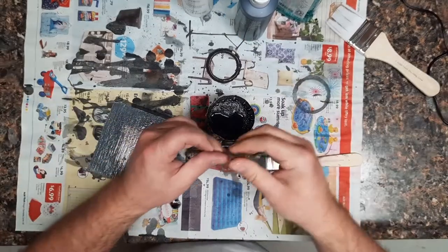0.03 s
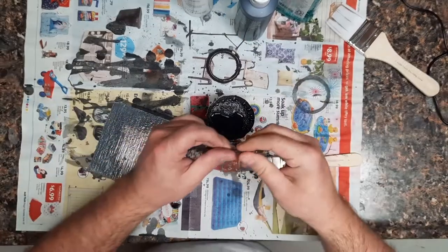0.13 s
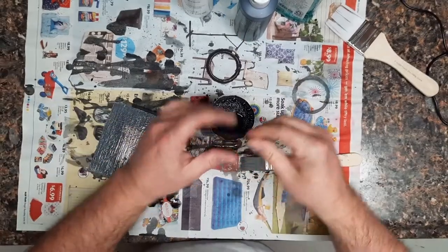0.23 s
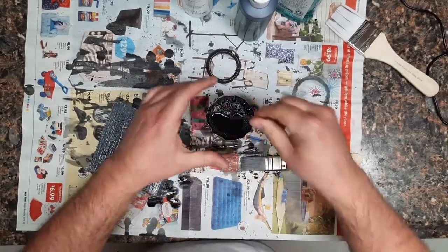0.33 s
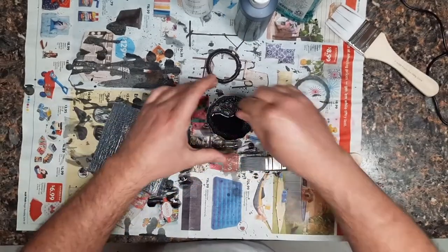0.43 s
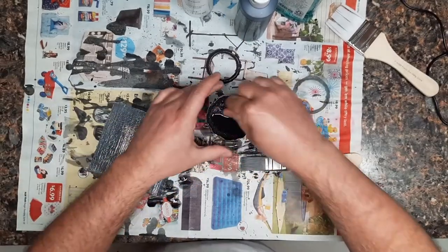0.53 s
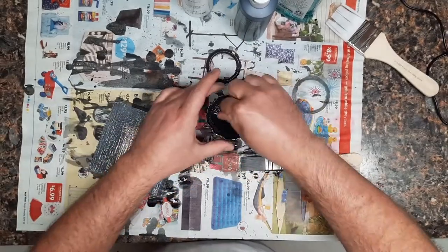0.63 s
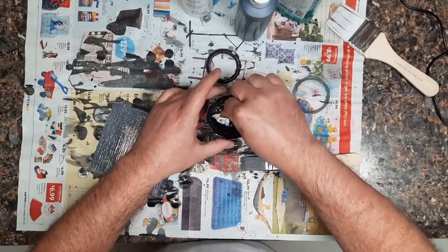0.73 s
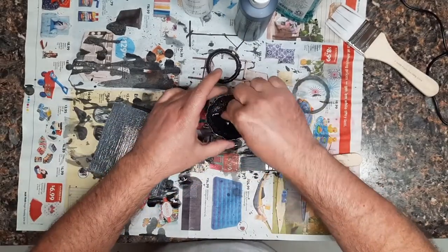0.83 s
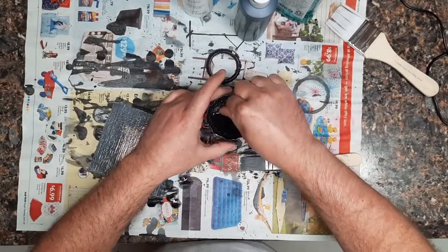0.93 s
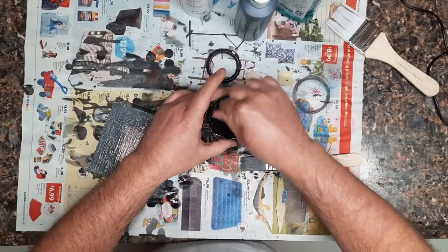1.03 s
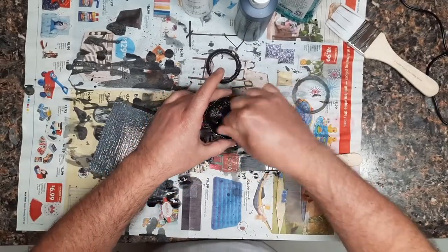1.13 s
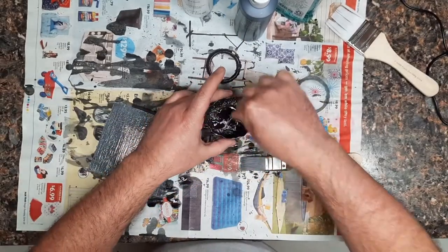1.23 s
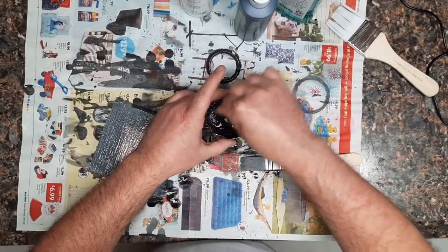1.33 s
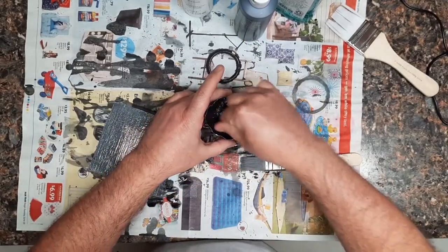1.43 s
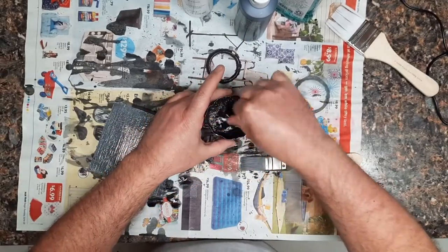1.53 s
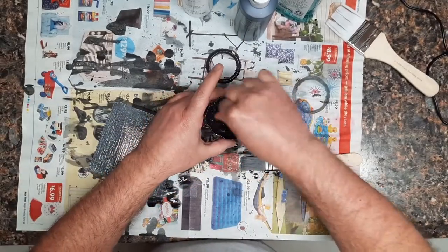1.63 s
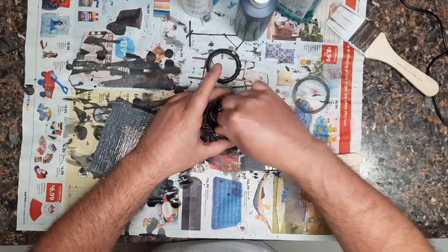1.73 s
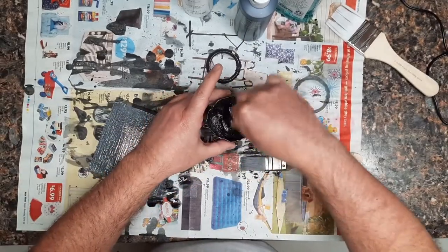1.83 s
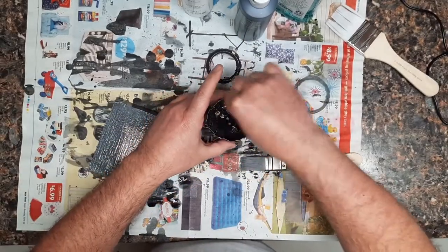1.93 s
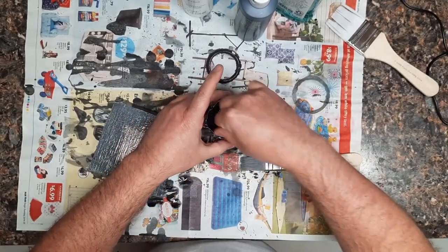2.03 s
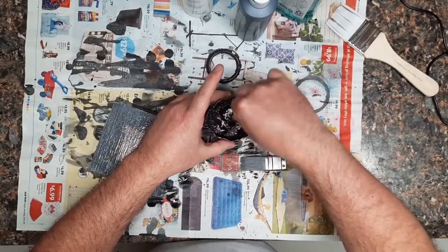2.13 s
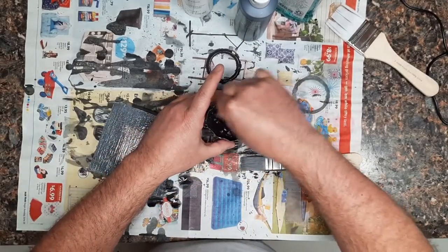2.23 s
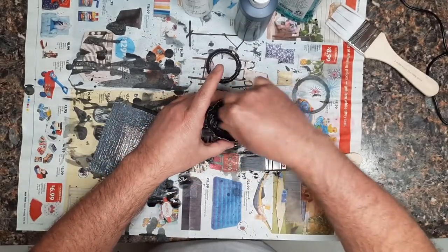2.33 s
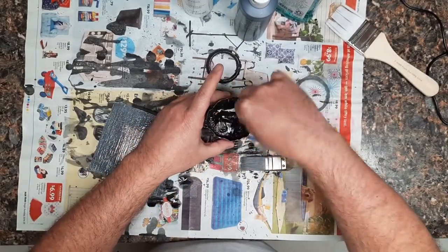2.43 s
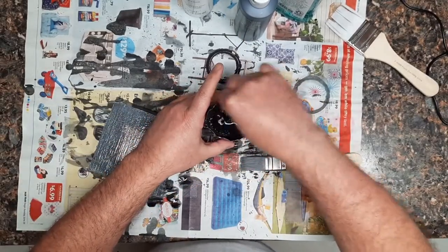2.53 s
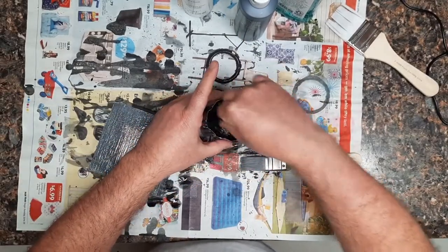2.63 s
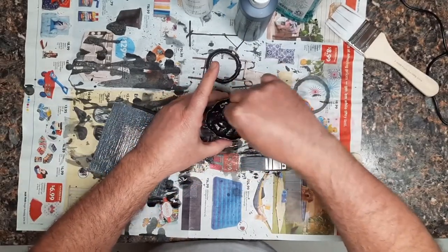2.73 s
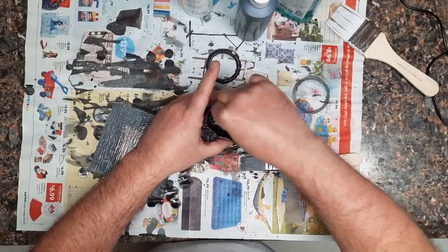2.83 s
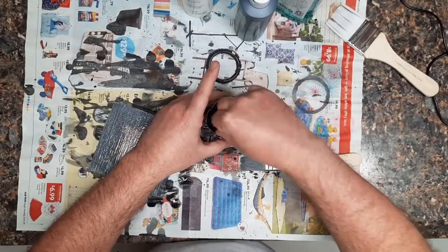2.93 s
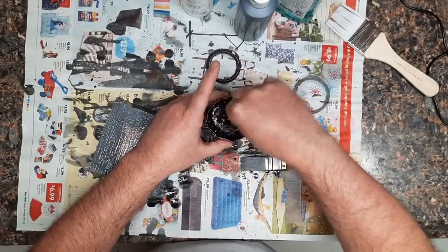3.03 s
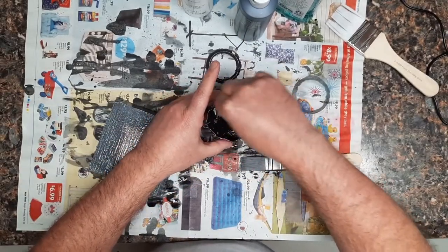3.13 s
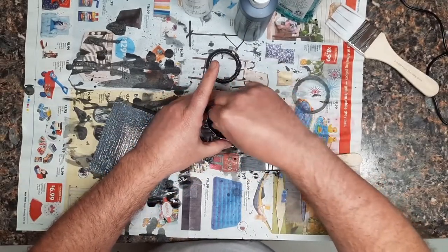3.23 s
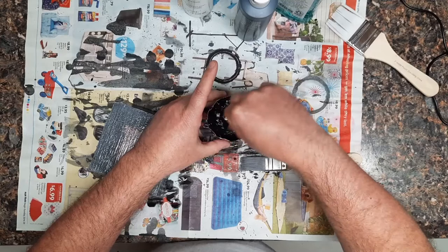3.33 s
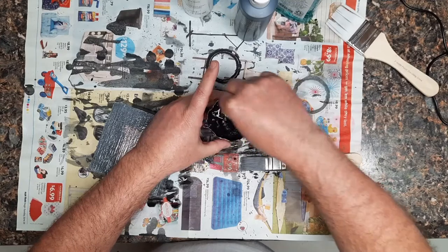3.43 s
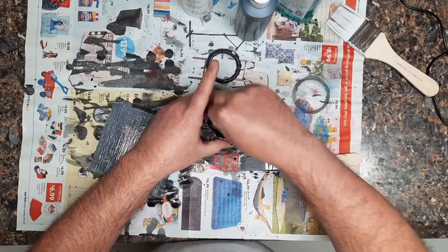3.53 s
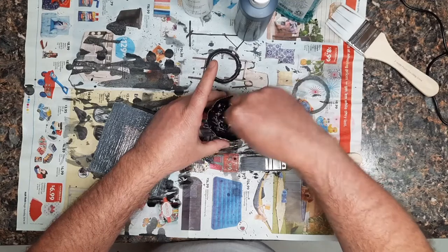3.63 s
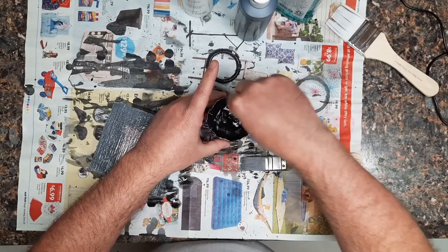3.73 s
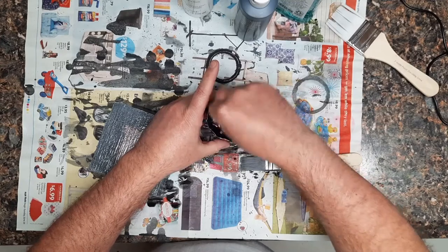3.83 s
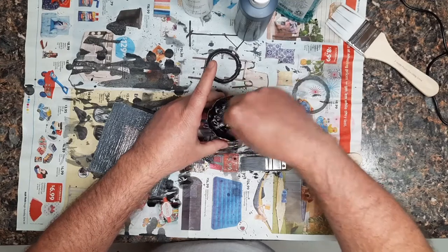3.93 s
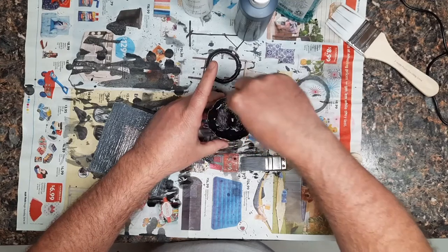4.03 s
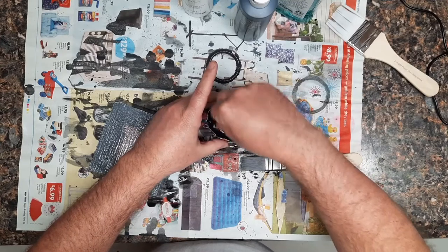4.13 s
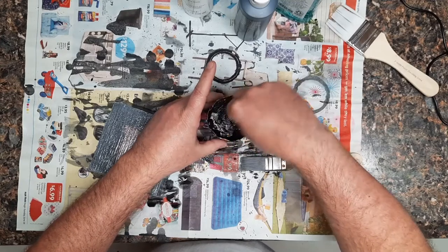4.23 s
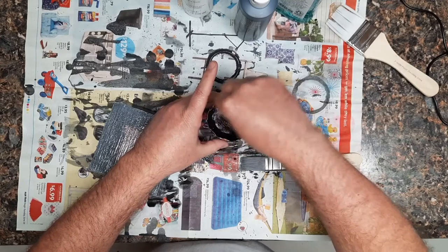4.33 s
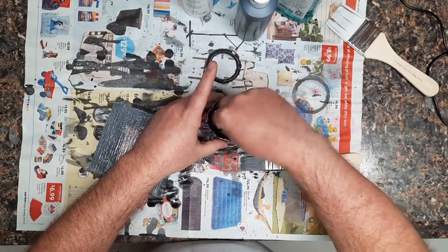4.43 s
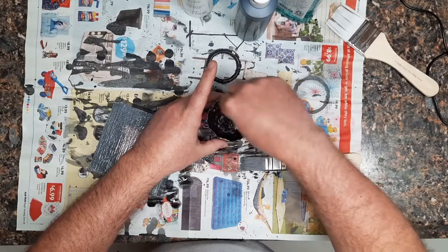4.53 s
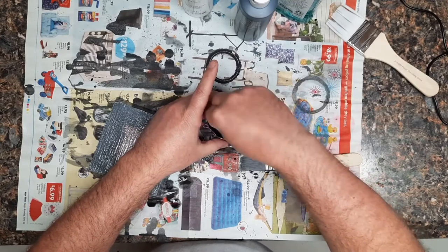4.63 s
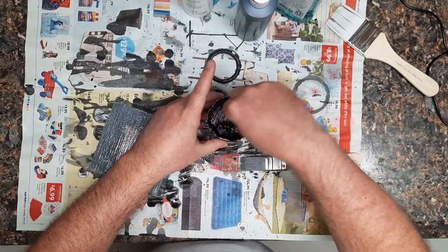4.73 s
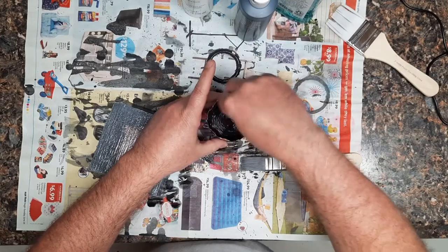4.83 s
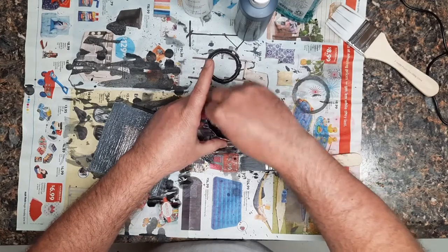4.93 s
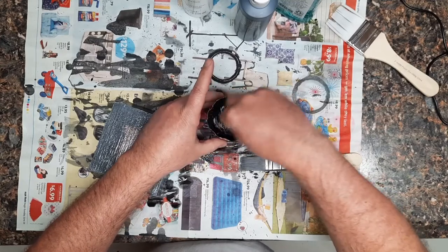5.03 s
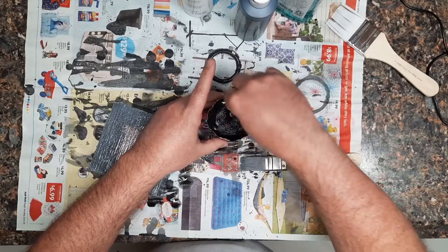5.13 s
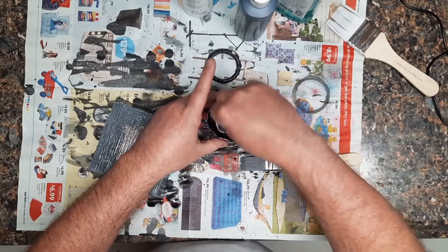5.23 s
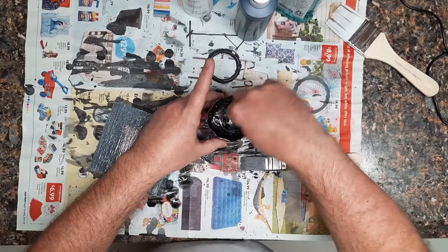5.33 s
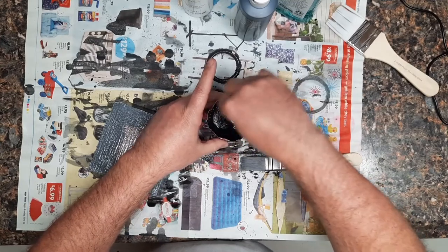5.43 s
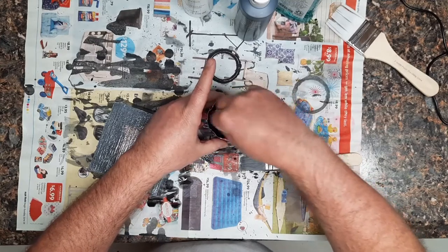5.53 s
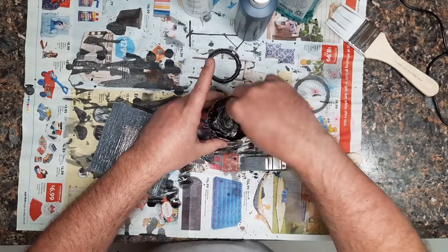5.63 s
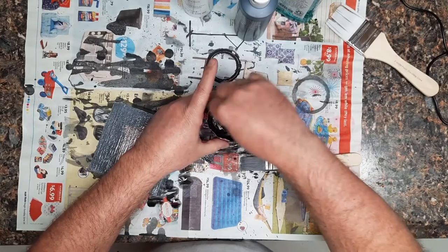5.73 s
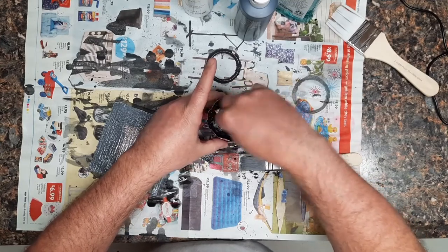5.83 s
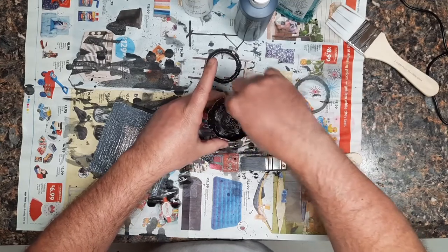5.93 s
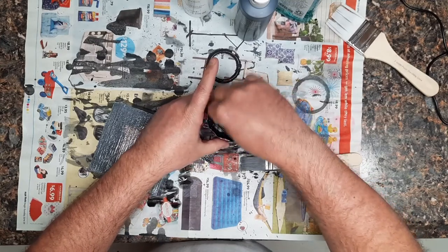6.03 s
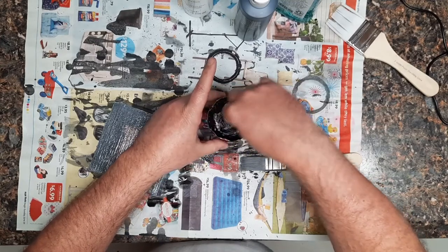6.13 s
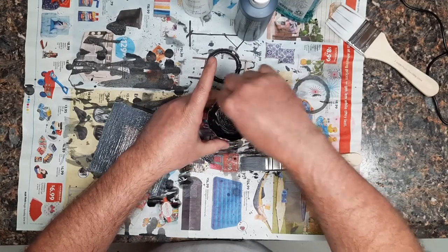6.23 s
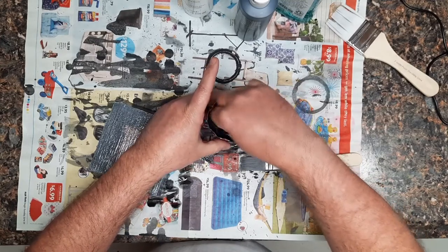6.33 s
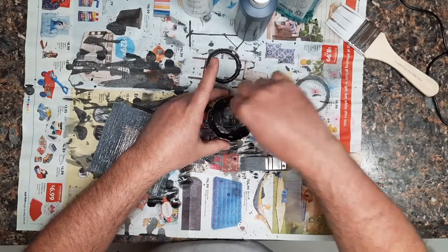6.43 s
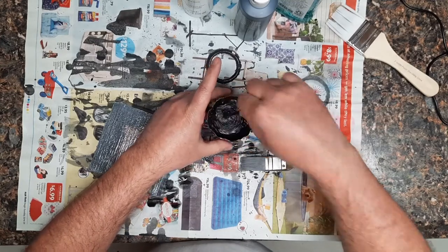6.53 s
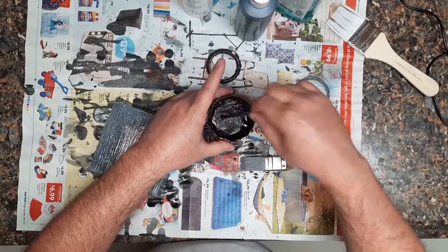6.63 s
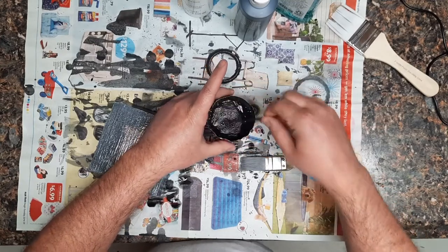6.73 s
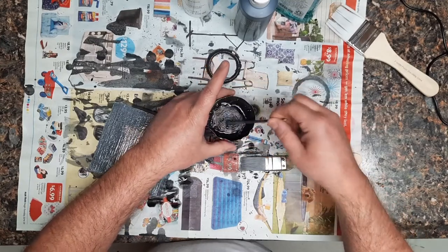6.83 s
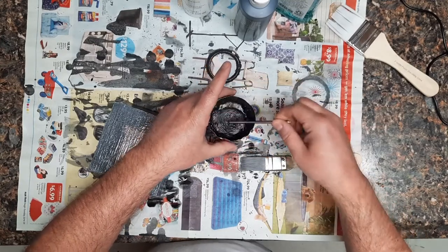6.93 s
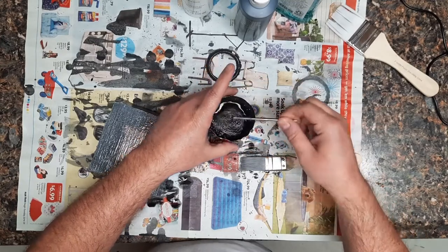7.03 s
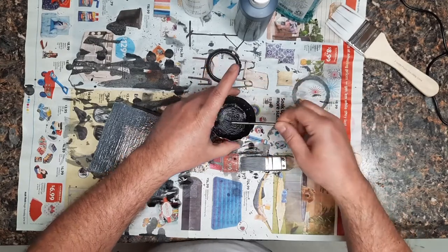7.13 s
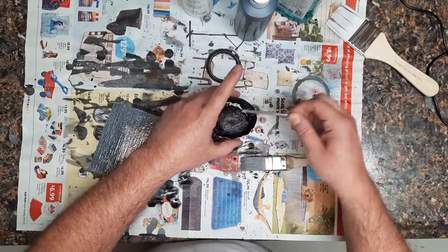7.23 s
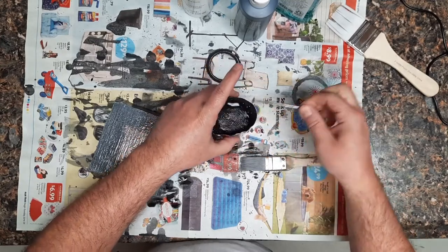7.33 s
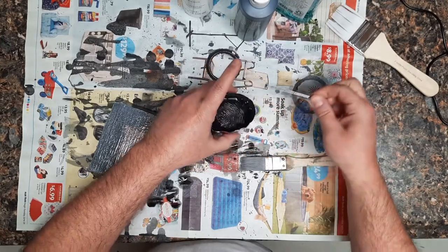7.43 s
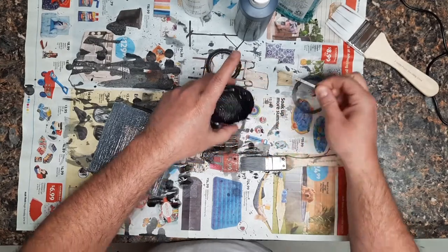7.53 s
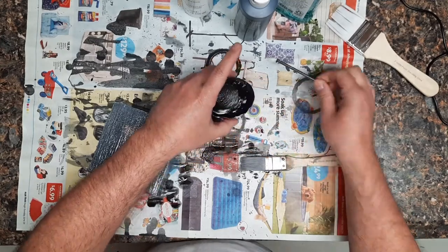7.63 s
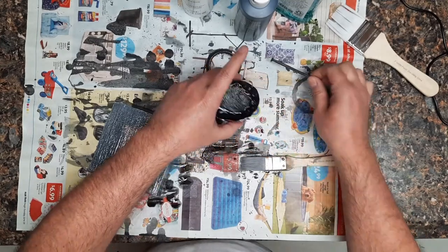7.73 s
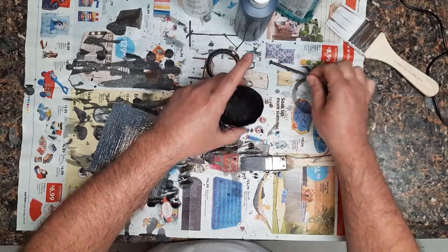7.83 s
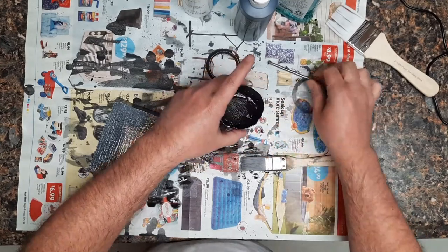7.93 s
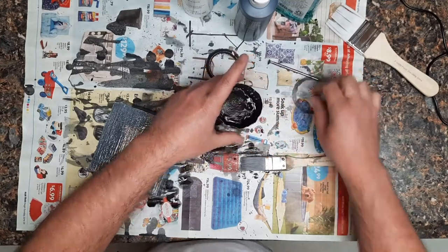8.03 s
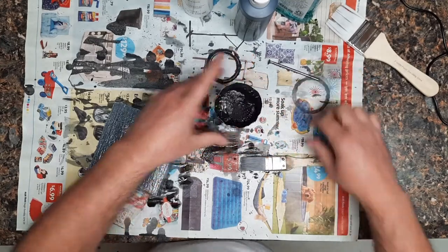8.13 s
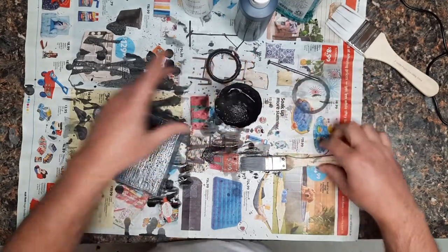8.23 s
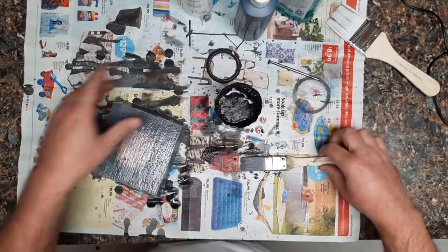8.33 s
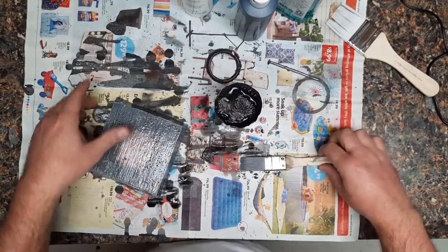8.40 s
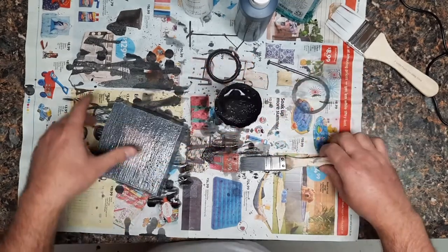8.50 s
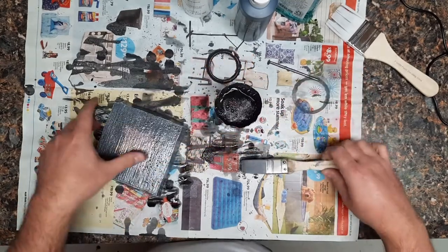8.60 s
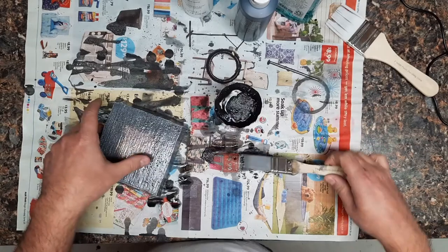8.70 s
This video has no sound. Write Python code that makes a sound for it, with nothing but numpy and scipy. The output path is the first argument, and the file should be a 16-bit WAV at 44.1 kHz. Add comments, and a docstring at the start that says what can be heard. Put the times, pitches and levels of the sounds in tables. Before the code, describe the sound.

A thin stick taps and scrapes rapidly inside a small plastic cup while stirring paint, then drops onto the counter with a light bouncing clatter.

```python
"""A thin stick stirs paint in a small plastic cup on a newspaper-covered stone counter, tapping and dragging.
Each tap is a short noise burst and a click that ring the cup, then a juddering slide and a knock below.
Drags and swipes are swelling grains of noise; squeaks are narrow rubbing tones. The dropped stick
bounces, fingers brush the paper, and soft bumps reach the slab. A small hard room answers all of this;
shaped noise and a steady sine make the faint hiss and hum beneath."""
import sys
import numpy as np
from scipy import signal
from scipy.fft import rfft, irfft
from scipy.io import wavfile
from scipy.ndimage import uniform_filter1d

SR = 44100
rng = np.random.default_rng(int(sys.argv[2]) if len(sys.argv) > 2 else 0)


def master(y):
    """Save y as 16-bit WAV."""
    cut = np.clip(np.atleast_2d(y).T, -1, 1)
    pcm = np.round(cut * 32767)  # scale
    wavfile.write(sys.argv[1], SR, pcm.astype(np.int16))


N = 386536   # length in samples


def from_db(db):
    """Turn decibels into a gain."""
    return 10 ** (np.asarray(db) / 20)


def rms_one(x):
    """Scale to unit rms."""
    return x / np.sqrt(np.mean(x ** 2) + 1e-20)


def at_hz(points, hz):
    """Read a curve between its points, on a logarithmic frequency axis."""
    point_hz, values = np.array(points).T
    return np.interp(np.log(hz), np.log(point_hz), values)


def coloured(x, spectrum):
    """Filter with unit energy and minimum phase, so that nothing sounds before the contact."""
    hz = np.maximum(np.fft.rfftfreq(4096, 1 / SR), 1)
    cepstrum = irfft(np.log(from_db(at_hz(spectrum, hz))))
    cepstrum[1:2048] *= 2   # folding the second half onto the first gives minimum phase
    cepstrum[2049:] = 0
    response = irfft(np.exp(rfft(cepstrum)))
    return signal.oaconvolve(x, response / np.linalg.norm(response))[:len(x)]


def body(drive_of, modes):
    """Side-by-side resonances of alternating sign, mode k driven by drive_of(k); unit power for unit white noise."""
    out, power = 0, 0
    for k, (hz, width, level_db) in enumerate(modes):
        radius = np.exp(-np.pi * width / SR)
        gain = (1 - radius ** 2) / 2
        b = gain * np.array([1, 0, -1]) * from_db(level_db) * (-1) ** k
        a = [1, -2 * radius * np.cos(2 * np.pi * hz / SR), radius ** 2]
        out = out + signal.lfilter(b, a, drive_of(k) + 1e-18)
        power += from_db(2 * level_db) * gain
    return out / np.sqrt(power)


def bursts(s, level_db, ms, power=1):
    """Noise that rises in a millisecond or two and fades over ms (0.5 to 120); a higher power holds, then stops."""
    envelope, t = np.zeros(N + 6000), np.arange(6000) / SR
    starts = (s * SR).astype(int)
    fades = np.clip(ms, .5, 120) / 1000
    for at, gain, fade in np.broadcast(starts, from_db(level_db), fades):
        envelope[at:at + len(t)] += gain * (1 - np.exp(-t / 0.00057)) * np.exp(-(t / fade) ** power)
    return envelope[:N] * rng.standard_normal(N)


def grains(per_s, spread_db):
    """Random slips of uneven size and either sign; rms 1."""
    sizes = from_db(spread_db * np.minimum(rng.exponential(1, N), 4)) * rng.choice([-1, 1], N)
    return rms_one(sizes * (rng.random(N) < per_s / SR))


def strokes(s, level_db, ms):
    """Bell-shaped swells of pressure, one per stroke."""
    t = np.arange(N) / SR
    return sum(from_db(db) * np.exp(-((t - at) * 1000 / half) ** 2)
               for at, db, half in np.broadcast(s, level_db, ms))


# How alike left and right are: (frequency [Hz], likeness [1 = the same, 0 = unrelated])
LIKENESS = [(50, .7), (300, .55), (700, .35), (1300, .5), (3000, .1), (12000, 0)]
# How the two sides differ: (frequency [Hz], left minus right [dB])
BALANCE = [(60, -1.5), (150, -1.5), (600, 1.5), (1500, 4.5), (3500, -1), (8000, 0.5), (14000, 1.5)]


def band_pairs(length, shape):
    """Half-octave bands of stereo noise, each with its likeness and balance, shaped by shape(Hz)."""
    out, edges = 0, 25 * 2 ** np.arange(0, 9.6, .5)
    white = rng.standard_normal((2, 2, length))   # neighbouring bands use different noise
    for k, (low, high) in enumerate(zip(edges, edges[1:])):
        band = signal.butter(2, [low, high], "band", fs=SR, output="sos")
        mid, side = signal.sosfilt(band, white[k % 2])
        hz = np.sqrt(low * high)
        alike = np.clip(at_hz(LIKENESS, hz), -1, 1)
        pair = np.sqrt(1 + alike) * mid + np.sqrt(1 - alike) * side * [[1], [-1]]
        balance = from_db(at_hz(BALANCE, hz) / 2 * np.array([[1], [-1]]))
        out = out + shape(hz) * pair * balance
    return out


# Tone of the background air: (frequency [Hz], relative level [dB per Hz])
AIR = [(15, -60), (25, -33), (43, -17.5), (90, -11), (121, -10.5), (163, -19), (220, -15.5), (280, -31.5),
       (313, -13.5), (389, -30.5), (1360, -38), (14800, -41), (16500, -61.5)]


def air():
    """Steady stereo noise shaped like the faint hiss and rumble of the place."""
    return from_db(-71) * rms_one(band_pairs(N, lambda hz: from_db(at_hz(AIR, hz))))


def hum():
    """Mains hum: one steady sine at 120 Hz, with an rms level of -75.5 dB."""
    return from_db(-75.5) * np.sqrt(2) * np.sin(2 * np.pi * 120 * np.arange(N) / SR)


# Deepest counter resonances: (frequency [Hz], width [Hz], level [dB])
SLAB = [(45, 6.7, -6), (66.5, 6, 2.5), (117, 70, -5.5)]
# Hand or cup bumping the counter: (time [s], level [dB])
THUMPS = [(0.635, -41.5), (1.271, -50.5), (1.82, -41.5), (2.64, -39.5), (3.311, -60), (4.998, -65),
          (5.223, -50), (5.596, -51.5), (6.171, -60), (6.937, -43), (7.128, -43.5), (7.959, -42.5),
          (8.086, -48)]


def thumps():
    """Soft bumps, fading over 36 ms, reach only the deepest modes."""
    push = bursts(*np.transpose(THUMPS), 36)
    return body(lambda k: push, SLAB)


# Main resonances of the cup: (frequency [Hz], width [Hz], level [dB])
CUP = [(1185, 30, 4), (1378.4, 230, -0.5), (1393.4, 165, 9), (1481, 137, 7), (1679, 47, 6), (2000, 65, 5),
       (1540, 2000, -11.5)]


def ring_cup(drive_of):
    """The cup wall rings at its main pitches."""
    return body(drive_of, CUP)


# Higher resonances of the cup: (frequency [Hz], width [Hz], level [dB])
CUP_UPPER = [(2494, 120, -9.5), (3050, 70, 3), (3190, 330, -2.5), (3406, 100, 2), (3610, 130, -4.5),
             (4360, 220, -5.5)]


def ring_upper_cup(drive_of):
    """The cup wall rings at its higher pitches."""
    return body(drive_of, CUP_UPPER)


# Resonances of the counter: (frequency [Hz], width [Hz], level [dB])
COUNTER = [(174, 29, -10), (325, 43, -1), (466, 61, -0.5), (555.7, 150, -5), (814, 280, -6.5)]


def ring_counter(drive):
    """The stone counter answers a knock or a rumble."""
    return body(lambda k: drive, COUNTER)


# The dry snap of a contact: (frequency [Hz], relative level [dB per Hz])
CRACK = [(500, -29.5), (1000, -16.5), (2200, -8.5), (4500, -6), (7800, -5.5), (13000, -11.5), (16500, -14)]


def snap(x):
    """Give a drive the bright, dry colour of hard things touching."""
    return coloured(x, CRACK)


# Rustle of paper: (frequency [Hz], relative level [dB per Hz])
PAPER = [(1500, -18), (3500, -16), (5500, -2.5), (8000, 2), (13000, -1), (16500, -9.5)]
# Fingers brushing: (time of the peak [s], level on paper [dB], half-length [ms])
BRUSH = [(7.744, -66.5, 73), (7.864, -67, 27), (8.06, -63, 31), (8.324, -54, 43), (8.44, -68, 60),
         (8.55, -70, 42), (8.68, -70, 43)]


def brush():
    """Skin rustles on paper in fine grains and faintly rubs the cup."""
    rub = grains(9500.0, 5.9) * strokes(*np.transpose(BRUSH))
    return coloured(rub, PAPER) + from_db(-23) * ring_cup(lambda k: rub)


# Resonances of the free stick: (frequency [Hz], width [Hz], level [dB])
STICK = [(4124, 120, -16), (6600, 28, 2), (12690, 24, 1)]
# The stick lands and bounces: (time [s], blow level before an 8 dB cut [dB],
# counter knock relative to the uncut blow [dB])
DROP = [(7.9427, -16.5, -19), (7.955, -24, -37), (7.968, -29, -22), (7.9844, -22, -18), (7.994, -39, -17),
        (8.076, -41, -16)]


def drop():
    """The free stick rings thinly as it bounces, with the cup and counter answering."""
    s, blow_db, knock_db = np.transpose(DROP)
    hit = bursts(s, blow_db - 8, 8.6)
    thud = bursts(s, blow_db + knock_db, 12.0)
    stick = from_db(-1.0) * body(lambda k: hit, STICK)
    cup = from_db(-4) * body(lambda k: hit, CUP + CUP_UPPER)
    return snap(hit) + stick + cup + ring_counter(thud)


# Faint rubbing tones: (time [s], pitch [Hz], level [dB], length [ms], held to at most 120)
SQUEAKS = [(.8, 1110, -66.5, 150), (7.681, 2114, -79.5, 97), (1.719, 560, -45, 32), (6.779, 2476, -62, 34),
           (6.97, 1656, -52, 25), (8.072, 1260, -55.5, 44), (8.17, 1200, -79, 110), (8.29, 1307, -79, 66)]


def squeaks():
    """Rubbing noise in one narrow resonance, 65 Hz wide."""
    out = 0
    for s, hz, level_db, ms in SQUEAKS:
        rub = bursts(np.array([s]), level_db, ms, power=1.6)
        out = out + body(lambda k: rub, [(hz, 65, 0)])
    return out


# Quick wet swipes along the wall: (time of the peak [s], level [dB], half-length [ms])
SWIPES = [(1.366, -48.5, 17), (1.587, -49, 13), (2.189, -38.5, 8.3), (2.455, -46, 17), (3.118, -46, 21.6),
          (3.426, -47, 24), (3.691, -47, 9.6), (4.266, -42, 15), (4.553, -41.5, 12), (4.841, -47.5, 16),
          (5.681, -40, 10.7), (5.917, -45.5, 11.6), (6.212, -40, 18), (6.427, -44, 16)]


def swipes():
    """Bright grainy hiss swells and fades under a bell-shaped stroke."""
    return snap(grains(5300.0, 1.0) * strokes(*np.transpose(SWIPES)))


# The stick drags round the wall: (time of the peak [s], level [dB], half-length [ms],
# counter rumble relative to the drag [dB])
DRAG = [(0.7, -63.5, 38, -14), (1.2, -91, 270, 10), (1.57, -55.5, 46, -18), (1.74, -46.5, 76, -6.5),
        (2.65, -86, 360, -9), (3.06, -54.5, 46, -6.5), (3.42, -55.5, 46, -9), (3.601, -51.5, 90, -4),
        (4.0, -61, 39, 0), (4.27, -60, 81, -18), (4.6, -67, 300, -24), (4.83, -60, 41, -6),
        (5.268, -45.5, 41, -5), (5.63, -43.5, 38, -10), (6.28, -46.5, 36, -1), (6.36, -64, 60, 2),
        (7.01, -69, 56, -25)]


def drag():
    """Dense uneven slips ring the cup, and sparser jolts ring the counter."""
    s, drag_db, ms, rumble_db = np.transpose(DRAG)
    press = strokes(s, drag_db, ms)
    slips = grains(1500., 5.5) * press
    jolts = grains(310.0, 7.6) * strokes(s, drag_db + rumble_db, ms)
    cup = ring_cup(lambda k: slips) + from_db(-7) * ring_upper_cup(lambda k: slips)
    treble = snap(grains(5000., 3.0) * press * from_db(-3))
    return cup + treble + ring_counter(jolts)


BLOW_MS, THUD_MS = 4.62, 16.3   # fade times of the blow and of the knock
LEAD_DB = -27.5   # faint bright noise before each blow, relative to the blow
SLIDE_DB, SLIDE_FOLLOWS = -40.5, 0.61   # slide after a -30 dB blow; share of the blow's swing it follows
SPOT_DB_PER_OCT, SLIDE_FAVOUR = -30.5, 0.88   # modes fade away from the spot's pitch; less so in a slide
UPPER_DB = -7.5   # higher modes relative to the blow
DAMPED_HZ, DAMPED_DB, DAMPED_OCT = 1584, -13.5, 0.11   # spots near this pitch sound them more weakly
WANDER_DB, WANDER_S = 4.5, .02   # size of the random level wander, and seconds between its new values
CLICK_DB, CLICK_CUT_HZ = 15, 2500   # click relative to the blow; soft plastic dulls it above the cut
CLICK_DIRECT_DB = -5.5   # click heard straight from the wall, relative to the click driving the modes

# Stick on cup: (time [s], blow level [dB], pitch favoured by the spot struck [Hz], snap relative to blow [dB],
# counter knock relative to blow [dB], slide length [ms])
TAPS = [(0.53, -43.5, 1640, -12, -17, 58), (0.6267, -21.5, 1500, -9.5, -23, 5.8),
        (0.635, -15.5, 1340, -17, -18.5, 42), (0.7711, -28, 2000, -5.5, -33, 32.5),
        (0.9674, -44, 2030, -5.5, -35, 29.7), (1.097, -48, 1400, -7, -37, 24),
        (1.2089, -35.5, 1560, -41, -51, 20), (1.2678, -25, 1450, -10.5, -33, 11.3),
        (1.277, -41.5, 1730, -4, -12, 77), (1.444, -46, 1340, -18, -16, 14),
        (1.455, -35, 1410, -28, -15, 27), (1.6051, -23, 1870, -2.5, -48, 2.8),
        (1.654, -33.5, 1440, -7, -31, 39), (1.726, -37.5, 1370, -0.5, -24, 21),
        (1.8021, -24.5, 1410, -13, -33, 7.1), (1.8552, -24.5, 1380, -8.5, -32, 37),
        (1.8982, -39, 1350, 0, -29, 4.2), (1.929, -26, 1320, -2.5, -27.5, 17),
        (2.0309, -25, 1390, -4, -38, 32), (2.0876, -25, 1280, -15, -39, 27),
        (2.152, -41, 1510, -14, -40, 35), (2.2063, -39, 1190, -12, -24, 35),
        (2.2305, -28.5, 1680, -2, -18, 52), (2.2583, -34.5, 1220, -21, -17, 7.7),
        (2.41, -25, 1740, -19.5, -16.5, 19.4), (2.509, -49, 2000, 5, -30.5, 8),
        (2.5565, -42.5, 1640, 2.5, -17, 21.4), (2.6305, -10, 1560, -0.5, -21, 50),
        (2.6823, -32.5, 1450, -1.5, -13, 64), (2.754, -23, 1730, -27, -36, 21),
        (2.9494, -29.5, 1680, -7, -27.5, 32), (3.0115, -25.5, 1440, -17, -17.5, 3.1),
        (3.14, -59, 1800, -14, -6.5, 6.8), (3.205, -61.5, 1360, -13, -30, 5.3),
        (3.273, -35, 1540, -32, -31, 24.5), (3.308, -31.5, 1480, -31, -6.5, 6),
        (3.321, -28, 1415, -27, -18, 14.4), (3.4414, -30.5, 1610, -30, -26, 6),
        (3.4714, -30, 1410, -1.5, -21, 9.2), (3.524, -41, 1500, -11, -40, 32),
        (3.5694, -27.5, 1340, -13, -12.5, 22), (3.618, -38, 1320, -10, -17, 13),
        (3.736, -51, 1580, -23, -29, 7.6), (3.886, -27.5, 1500, -12, -15.5, 17),
        (3.9, -26.5, 1292, -17, -16.5, 85), (3.9667, -43, 1260, -1.5, -2.5, 54),
        (4.0203, -26.5, 1400, 0, -25.5, 26), (4.169, -26.5, 1680, -9, -22, 51),
        (4.2049, -28.5, 1400, -25, -9, 120), (4.277, -36.5, 1360, -3, -3, 29),
        (4.4164, -20.5, 1640, -11, -21, 48), (4.4497, -20, 1320, -12.5, -12.5, 27),
        (4.507, -35.5, 1680, -12, -25, 32), (4.5897, -19, 1520, -5.5, -30.5, 44),
        (4.625, -20.5, 1560, -13, -40, 36), (4.7076, -20, 1450, -17.5, -18, 10),
        (4.91, -57, 1890, 8.5, -6, 15.7), (4.9902, -23, 1360, -10.5, -15.5, 37),
        (5.0236, -30.5, 1380, -19, -19, 36), (5.0627, -40, 1410, 0.5, -15, 34),
        (5.1124, -42, 1600, -21, -42, 41), (5.131, -30, 1660, -10, -45, 33),
        (5.2284, -25, 1580, -6, -11, 16), (5.296, -21, 1630, -4.5, -16, 41),
        (5.3245, -22, 1310, -13.5, -11, 50), (5.364, -30.5, 1640, -1.5, -10.5, 33),
        (5.487, -53, 1430, -9, -20, 4.6), (5.525, -24.5, 1340, -6, -33, 35),
        (5.569, -15, 1380, -8, -22, 15), (5.701, -39, 1600, -21, -38, 9.5),
        (5.8332, -35.5, 1380, -7, -11.5, 41), (5.8797, -37.5, 1400, -6, -9.5, 30),
        (6.097, -37, 1580, -5, -10, 53), (6.1167, -18.5, 1400, -10, -20.5, 9.8),
        (6.162, -36.5, 1400, -6.5, -21, 37), (6.2519, -15.5, 1550, -6, -30, 24.5),
        (6.3787, -19.5, 1490, -21.5, -17.5, 21), (6.7795, -46, 1640, -7.5, -15, 27.4),
        (6.9316, -25.5, 1620, -9.5, -4, 53), (6.982, -34, 1610, -22, -36, 28.6),
        (7.1166, -11, 1486, -2, -11, 62.5)]


def taps():
    """Every tap favours the cup modes near one pitch, snaps, slides on, and knocks the counter."""
    s, blow_db, spot_hz, snap_db, knock_db, ms = np.transpose(TAPS)
    slide_db = SLIDE_DB + SLIDE_FOLLOWS * (blow_db + 30)
    damping = np.exp(-(np.log2(spot_hz / DAMPED_HZ) / DAMPED_OCT) ** 2)
    upper_db = UPPER_DB + DAMPED_DB * damping
    # the tip sticks and slips as it slides
    judder = rms_one(uniform_filter1d(np.abs(grains(500., 2.0)), size=150))

    def blow(db):
        return bursts(s, blow_db + db, BLOW_MS)

    def slide(db):
        return judder * bursts(s, db + slide_db, ms, power=7.2)

    # faint bright noise that starts 5 ms before each blow
    lead_in = snap(bursts(s - .005, blow_db + LEAD_DB, 12.0))
    clicks = np.zeros(N)
    clicks[((s + .001) * SR).astype(int)] = from_db(blow_db + CLICK_DB)
    clicks = signal.lfilter(*signal.butter(2, CLICK_CUT_HZ, fs=SR), clicks)

    # each moment uses the spot of the latest tap
    latest = np.maximum(np.searchsorted(s * SR, np.arange(N)) - 1, 0)
    share_db = SPOT_DB_PER_OCT * np.abs(np.log2(spot_hz[:, None] / np.array(CUP)[:, 0]))
    chance = rng.standard_normal((len(CUP) + len(CUP_UPPER), 1000))

    def wander(k):
        """The level of each mode wanders as the tip moves."""
        steps = np.arange(N) / SR / WANDER_S
        return from_db(WANDER_DB * np.interp(steps, np.arange(chance.shape[1]), chance[k]))

    hit, rub = blow(0) + clicks, slide(0)
    high_hit, high_rub = blow(upper_db), slide(upper_db)

    def cup_drive(k):
        struck = hit * from_db(share_db[:, k])[latest]
        rubbed = rub * wander(k) * from_db(SLIDE_FAVOUR * share_db[:, k])[latest]
        return struck + rubbed

    cup = ring_cup(cup_drive) + ring_upper_cup(lambda k: high_hit + high_rub * wander(-k - 1))
    snaps = snap(blow(snap_db) + slide(snap_db))
    # the heavy slab answers late
    thud = bursts(s + 0.0038, blow_db + knock_db, THUD_MS)
    return cup + lead_in + from_db(CLICK_DIRECT_DB) * clicks + snaps + ring_counter(thud)


ROOM_DB = 5   # level of the reflections, before the shared scaling at the end of room()
FILL_CYCLES, PATTERNS = 0.86, 12   # cycles for the reflections to fill up; number of patterns in turn
# How long the room rings: (frequency [Hz], time to fall by 60 dB [s])
ROOM_T60 = [(100, 0.28), (300, 0.27), (800, 0.18), (2000, 0.21), (5000, 0.24), (13000, 0.17)]
# Counter and hands echo the direct sound: (delay to left [ms], delay to right [ms], level re direct [dB])
NEAR_ECHOES = [(.35, .6, -15), (1.3, .9, -15), (2.2, 2.9, -15.5), (4.1, 3.5, -5.5)]


def room(x):
    """Direct sound, then reflections that fill up slower in the bass, die band by band
    and change to a new random pattern at twelve equal steps."""
    length, step = SR // 4, N // PATTERNS + 1
    t = np.arange(length * PATTERNS) % length / SR   # restarts for each pattern

    def fill_and_die(hz):
        return (1 - np.exp(-t * hz / FILL_CYCLES)) * from_db(-60 * t / at_hz(ROOM_T60, hz))

    tail = band_pairs(len(t), fill_and_die)
    tail *= from_db(ROOM_DB) / np.sqrt(np.sum(tail ** 2) / 2 / PATTERNS)
    reflected = np.zeros((2, N + step + length))
    for k in range(PATTERNS):
        part = x[None, k * step:(k + 1) * step]
        wet = signal.fftconvolve(part, tail[:, k * length:(k + 1) * length], axes=1)
        reflected[:, k * step:k * step + wet.shape[1]] += wet

    # a small source radiates little bass
    direct = signal.lfilter(*signal.butter(1, 600, "high", fs=SR), x)
    near = np.zeros((2, 300))
    near[[0, 1], [0, 1]] = 1   # the right port hears it a sample later
    for k, (left_ms, right_ms, echo_db) in enumerate(NEAR_ECHOES):
        delays = [round(left_ms * SR / 1000), round(right_ms * SR / 1000)]
        near[[0, 1], delays] += (-1) ** k * from_db(echo_db)
    near *= from_db([[8.0], [6.5]])   # left, right
    ports = signal.oaconvolve(direct[None], near, axes=1)[:, :N]
    return (reflected[:, :N] + ports) / np.sqrt(1 + from_db(2 * ROOM_DB))


def scene():
    """Cup, stick and paper in the room, over air noise and mains hum."""
    sources = thumps() + brush() + drop() + squeaks() + swipes() + drag() + taps()
    return room(sources) + air() + hum()


# Microphone tone, with a notch from its port: (frequency [Hz], relative level [dB])
MIC = [(20, 4.5), (8300, -1.5), (9500, -10), (11000, -4), (13500, 1), (16500, -1.5)]


def record(dry):
    """Microphone colour; a look-ahead gain control ducks just before a sudden rise; the top is cut."""
    heard = np.array([coloured(side, MIC) for side in dry])
    # differences between samples make the level follow the treble
    power = np.mean(np.diff(heard, prepend=0) ** 2, axis=0)
    level_db = 10 * np.log10(uniform_filter1d(power, size=88) + 1e-12)
    ahead_db = np.append(level_db[400:], [level_db[-1]] * 400)   # 400 samples, about 9 ms
    # only rises of more than 24 dB count
    duck_db = np.clip(0.24 * (ahead_db - level_db - 24), 0, 18)
    duck_db = uniform_filter1d(duck_db, size=88)
    top_cut = signal.ellip(9, .5, 70, 16150, fs=SR, output="sos")   # cutoff in Hz
    return signal.sosfilt(top_cut, heard * from_db(-duck_db))


dry = scene()
out = record(dry)
master(out)
```